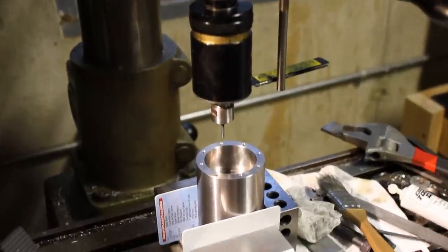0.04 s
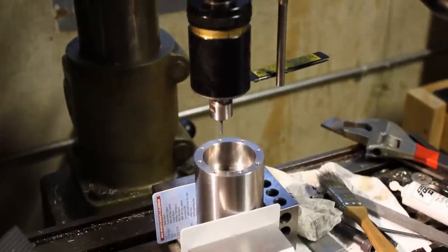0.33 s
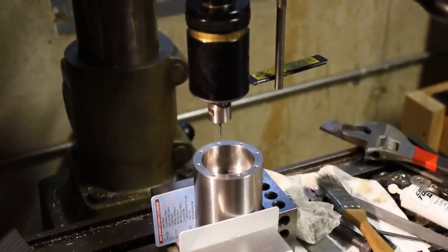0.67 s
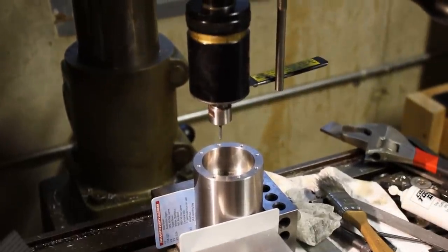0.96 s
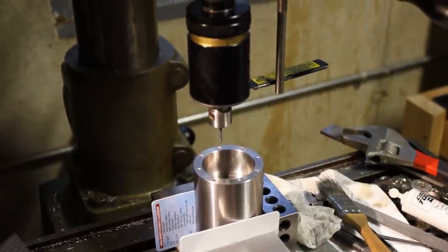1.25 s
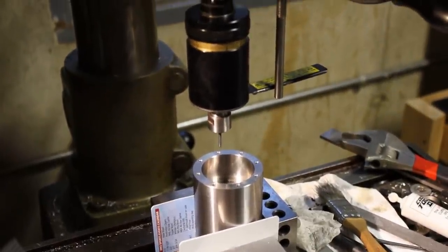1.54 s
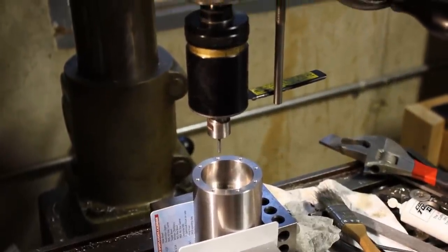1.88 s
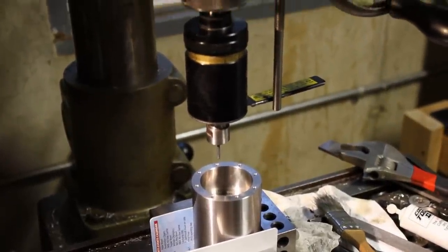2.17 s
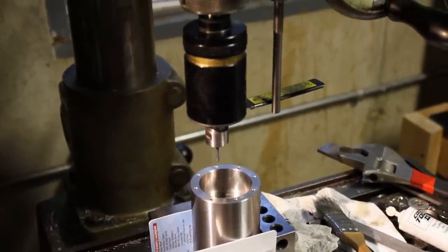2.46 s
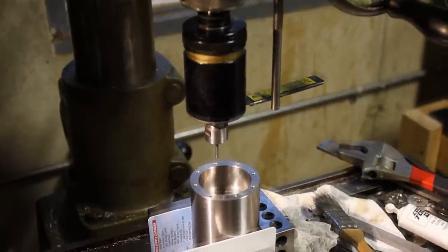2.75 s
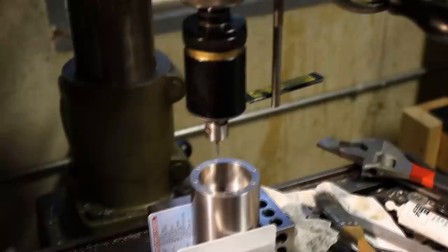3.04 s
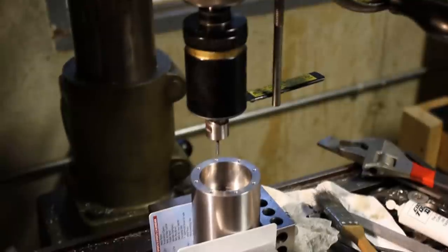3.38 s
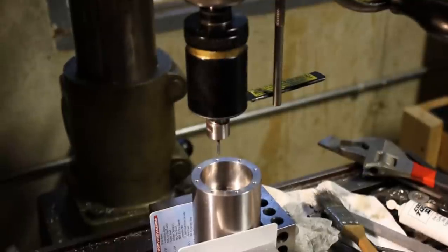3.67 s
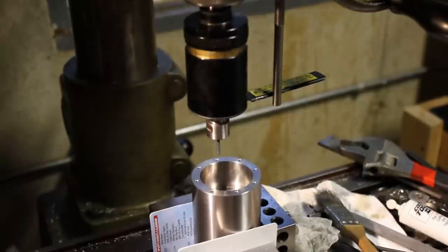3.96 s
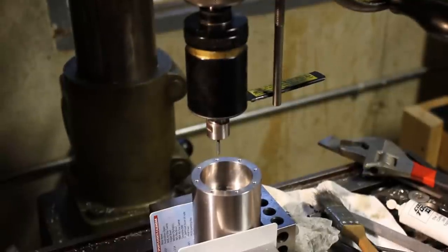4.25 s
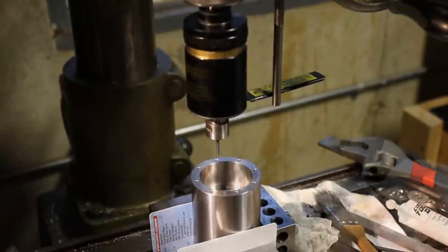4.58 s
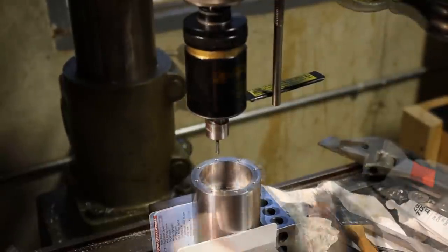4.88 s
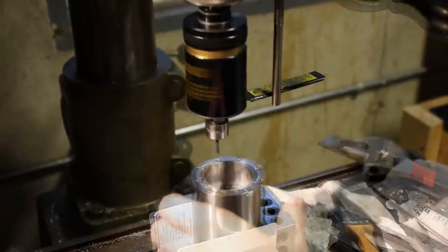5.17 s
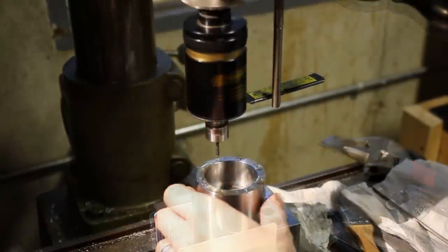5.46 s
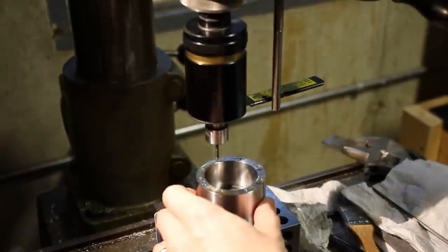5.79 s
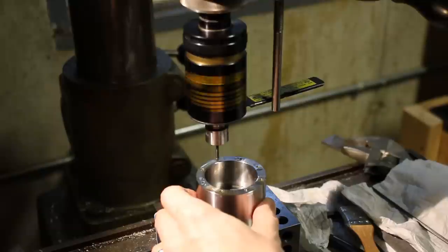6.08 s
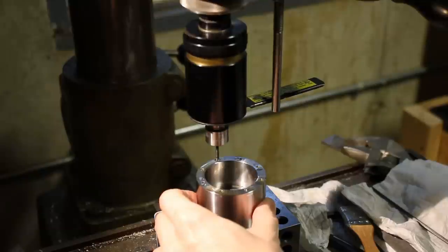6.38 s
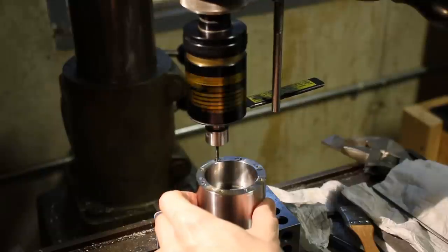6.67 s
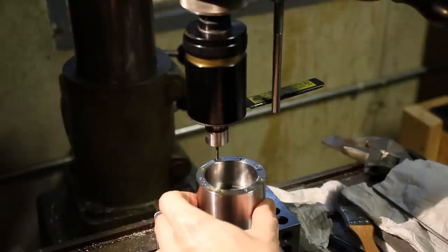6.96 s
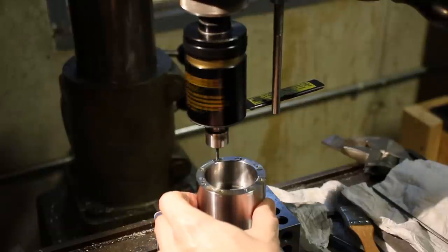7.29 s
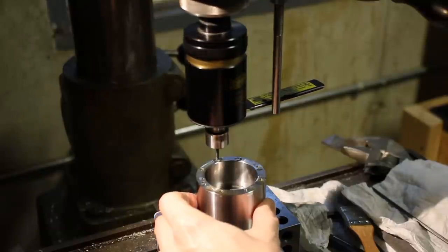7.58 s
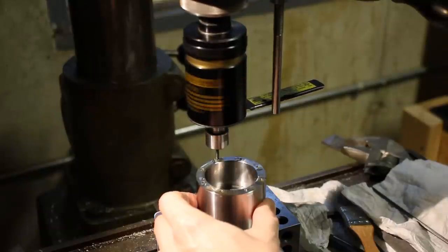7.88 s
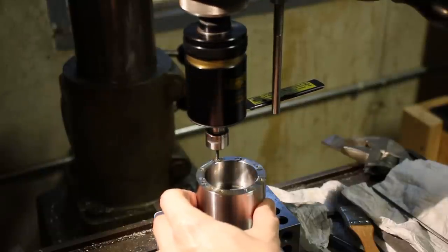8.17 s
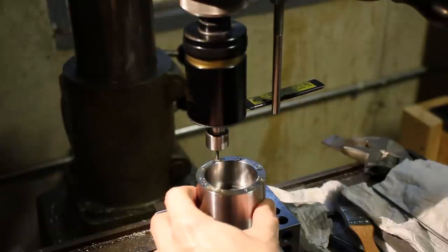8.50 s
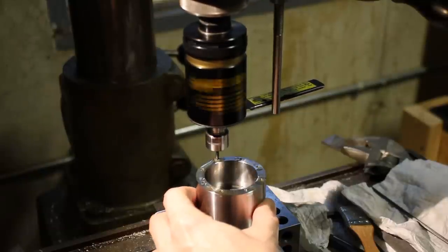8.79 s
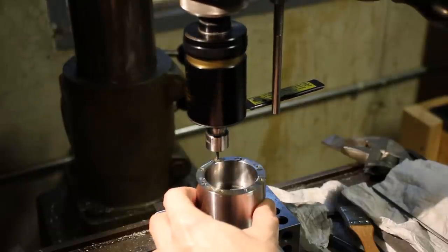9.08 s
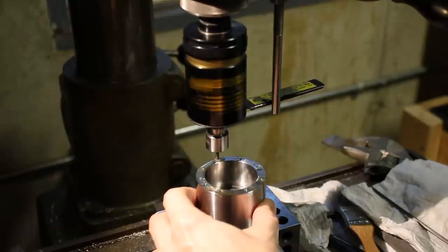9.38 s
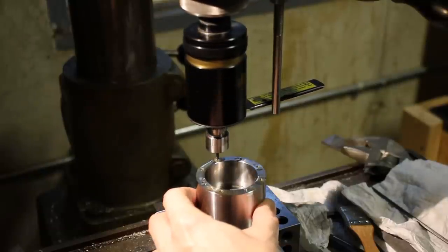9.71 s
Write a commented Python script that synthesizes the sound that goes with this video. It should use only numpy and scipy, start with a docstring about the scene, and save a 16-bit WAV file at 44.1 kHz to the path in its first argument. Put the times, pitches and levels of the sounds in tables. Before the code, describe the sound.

A drill press with a tapping head, heard up close in a workshop. At first there is only low fan hum and the light ticking of the handle being eased down. A sharp switch click brings on loud, steady whirring and metallic chatter with ringing tones. Small knocks and brief steel rasps come through, and in the last few seconds the belt flutters more strongly as the machine keeps running.

```python
"""Drill press tapping

A quiet workshop hums; the quill is eased down with faint ticks and scrapes, and a switch snaps. Then the scene
changes to the press at full speed: its inverter-fed motor whines, and belts, pulleys and a tapping head rattle
densely, ringing the iron frame and the head's steel shell. As the tap bites, the belt slaps harder, the shell
rings louder and the spindle groans once a turn."""
import sys
import numpy as np
from scipy import signal
from scipy.fft import rfft, irfft
from scipy.io import wavfile
from scipy.ndimage import uniform_filter1d

SR = 44100
rng = np.random.default_rng(int(sys.argv[2]) if len(sys.argv) > 2 else 0)


def int16_out(signal):
    """Quantize to a 16-bit WAV file."""
    q = np.round(np.clip(np.atleast_2d(signal).T, -1, 1) * 32767)
    wavfile.write(sys.argv[1], SR, q.astype(np.int16))


N = 433944

START_S, SUPPLY_HZ = 4.379, 47.95  # the motor shaft turns at the supply rate
BITE_S, BITE_LENGTH_S = 7.08, 0.46
DESCENT_S, DESCENT_LENGTH_S = 6.2, 3

# rattle force (time [s], level [dB])
RATTLE_LEVEL = [(4.4, -26.5), (4.9, -28), (5.35, -26.7), (5.65, -27), (5.88, -29), (6.23, -25),
                (6.45, -27.5), (6.85, -27), (7.5, -26.5), (8.1, -27), (8.9, -28), (9.35, -28),
                (9.55, -29.5), (9.82, -26.5)]
# shaft pressure on the rattle (multiple of shaft rate, depth [0-1])
SHAFT_HARMONICS = [(1, 0.1), (2, 0.05), (3, 0.02), (4, 0), (6, 0)]
# backlash knocks (time [s], level [dB], t60 [s])
BACKLASH_KNOCKS = [(4.613, -21.5, 0.068), (4.786, -24, .07), (5.028, -25.5, 0.11), (5.549, -22, 0.054),
                   (5.672, -21.5, .04), (6.117, -20.5, .04), (6.204, -21.5, .05), (6.54, -25, .08),
                   (6.787, -22, 0.048), (7.965, -32, 0.045), (8.06, -23, 0.067), (8.162, -23.5, 0.044),
                   (8.75, -20.5, 0.04), (9.384, -25.5, 0.088), (9.487, -24, .04), (9.581, -17.5, 0.023)]
# frame, table and belt guard (frequency [Hz], width [Hz], gain [dB])
FRAME_MODES = [(339, 38, -19), (431.7, 9.4, -12), (484, 23, -13.5), (534, 51, -15.5), (614, 17, -16.5),
               (705, 42, -12.5), (763, 13.3, -9.5), (805, 10, -30), (840, 37, -13.5), (897, 36, -13),
               (946, 10, -12), (1000, 20, -12.5), (1097, 35, -13.5), (1170, 12, -15), (1205, 24, -11.5),
               (1233, 5.6, -6.5), (1284, 36, -11.5), (1310, 19, -12.5), (1351, 5.7, -7.5), (1387, 18, -9),
               (1465, 32, -13), (1500, 23, -10.5)]
# tapping head and pulleys (frequency [Hz], width [Hz], gain [dB])
HEAD_MODES = [(1579, 25, -3.9), (1625, 13, -2.4), (1666, 26, -7.7), (1755, 68, -7.7), (1850, 39, -9.1),
              (1895, 24, -8.7), (1963, 10, -1.9), (2001, 45, -5.2), (2090, 52, -5.3), (2224, 50, -11.4),
              (2404, 40, -10.8), (2492, 23, -9.0), (2549, 30, -10.6), (2656, 16, -12.5), (2792, 150, -16.3),
              (3003, 35, -18.0), (3130, 86, -12.3), (3256, 80, -17.9), (3359, 59, -18.1), (3511, 55, -16.8),
              (3641, 74, -16.2), (3760, 17, -17.5), (3875, 23, -14.5), (3967, 66, -17.6), (4060, 23, -11.8),
              (4493, 17, -20.4), (4623, 150, -23.5), (4857, 42, -23.9), (5138, 40, -26.5),
              (5448, 51, -27.2)]
# bearings and chuck (frequency [Hz], width [Hz], gain [dB])
BEARING_MODES = [(6320, 90, -38), (7600, 100, -30), (8060, 90, -29.5), (8940, 410, -31), (9930, 170, -29.5),
                 (10400, 180, -31.5), (11850, 270, -37), (13600, 250, -37), (14130, 330, -29.5),
                 (14700, 150, -36), (15250, 350, -33)]
# floor of weak modes between these (frequency [Hz], gain [dB])
PRESS_COLOUR = [(25, -45), (95, -49), (170, -38.5), (295, -30.5), (370, -21), (700, -22), (1500, -20),
                (2300, -18.5), (3200, -28.5), (4200, -21.5), (5000, -32), (8800, -36.5), (12800, -39.5),
                (15600, -44)]
# head's steel shell (frequency [Hz], width [Hz])
SHELL_MODES = [(1605, 72), (2040, 86)]
# column rumble (frequency [Hz], gain [dB])
COLUMN_COLOUR = [(25, -14), (70, -14), (105, 5), (190, 1.5), (260, -0.5), (600, -58)]
# magnetic whine (multiple of carrier, offset [multiples of supply rate], relative level [dB])
WHINE_LINES = [(1, -7, -57), (1, -3, -52), (1, -1, -48), (1, 1, -56), (1, 3, -53), (2, -10, -67),
               (2, -8, -63), (2, -7, -69), (2, -6, -56), (2, -5, -64), (2, -4, -56), (2, -3, -65),
               (2, -2, -63), (2, -1, -71), (2, 0, -64), (2, 2, -64), (2, 4, -68), (3, -11, -71),
               (3, -9, -64), (3, -7, -70), (3, -5, -65), (3, -1, -65), (3, 1, -67), (3, 3, -70)]
# motor and belt hum (frequency [Hz], relative level [dB])
MOTOR_HUM = [(143.8, -66), (192, -70), (285.3, -53.5), (430.7, -56), (764.4, -54.5)]
# steel workpiece grating (time [s], frequency [Hz], width [Hz], level [dB], t60 [s])
WORKPIECE_TOUCHES = [(5.148, 12250, 500, -39, 0.093), (5.148, 13450, 300, -46, .1),
                     (8.228, 5000, 500, -34.5, .06), (8.346, 10750, 450, -47.5, .2),
                     (8.396, 8750, 600, -36, 0.073), (9.093, 4900, 450, -37, .12),
                     (9.398, 10700, 400, -42, .15)]
# switch housing (frequency [Hz], width [Hz], gain [dB])
SWITCH_MODES = [(200, 110, -1), (520, 200, -9), (1370, 120, -7), (2290, 260, -3.5), (3300, 400, -5.5),
                (3900, 340, 2.5), (5450, 500, -7.5), (6340, 300, -10), (7300, 500, -11), (10450, 920, -7.5),
                (12300, 550, -10), (13300, 810, -11)]
# feed handle (time [s], level [dB], tilt [dB/octave])
HANDLE_TICKS = [(.088, -50, -4), (.177, -55, -3.5), (.236, -57, 0), (.319, -53.5, -.5), (1.386, -59, 1),
                (3.07, -55, 2), (3.153, -46, 4), (3.239, -51, 5), (3.25, -52, 3), (3.29, -50, 3),
                (3.37, -54, 4)]
# quill in its sleeve (centre [s], half length [s], level [dB], tilt [dB/octave])
QUILL_SCRAPES = [(0.309, .006, -60, -4.5), (2.198, .04, -60.5, -5.5), (3.143, 0.015, -49.5, -1),
                 (3.234, 0.06, -59, -2), (3.461, 0.012, -55, 2), (3.785, .008, -58, -5.5)]
# ticks and scrapes (frequency [Hz], gain [dB])
FEED_COLOUR = [(100, -39), (700, 0), (1500, 2), (2300, 1), (3300, -3), (3950, 5), (4700, -4), (9000, -7.5),
               (13000, -8), (16000, -21)]
# background air (frequency [Hz], gain [dB])
AIR_COLOUR = [(15, -43), (25, -21.5), (44, -11), (75, -18.5), (119, -9), (188, -12.5), (204, -10.5),
              (267, -10), (349, -17.5), (378, -18), (523, -18), (567, -18), (1020, -19), (1340, -23),
              (3400, -32), (5000, -34), (6500, -37.5), (15500, -46.5)]
# air swell and dip (start [s], end [s], change above the bass [dB], bass change [dB])
AIR_SWELLS = [(2.55, 4.06, 3.5, 1.5), (4.19, 4.3, -3, -8)]
# mains and fans (frequency [Hz], relative level [dB])
MAINS_FAN_HUM = [(50, -72.5), (120, -66), (153, -71.5), (219, -69), (257, -71.5), (274, -68.5), (377, -74),
                 (555, -74.5), (614, -80), (856, -76), (990, -77.5)]


def rattle(impacts_per_s=9000, scatter_db=1.5, hiss=0.81, flutter_db=0.74):
    """Loose splines and gears chatter in step with shaft and belt, ringing the whole machine."""
    hits = rng.random(N) < impacts_per_s / SR
    impacts = hits * rng.standard_normal(N) * undb(scatter_db * rng.standard_normal(N))
    force = unit(unit(impacts) + hiss * rng.standard_normal(N))
    level_db = np.interp(clock(), *np.transpose(RATTLE_LEVEL)) + flutter_db * walk(70)
    force = force * contact_pressure() * undb(level_db)
    for time_s, db, t60_s in BACKLASH_KNOCKS:
        add(force, time_s, undb(db) * burst(t60_s))
    return ring(force, response(PRESS_COLOUR, FRAME_MODES + HEAD_MODES + BEARING_MODES))


def contact_pressure(shaft_peak_s=4.431, belt_hz=11.25, slap_s=9.037, idle_depth=0.035, load_depth=0.13):
    """The shaft presses the loose contacts every turn; the belt slaps once a lap, harder under load."""
    t, bite = clock(), ramp(BITE_S, BITE_LENGTH_S)
    shaft_phase = 2 * np.pi * SUPPLY_HZ * (t - shaft_peak_s)
    shaft = sum(depth * np.cos(k * shaft_phase) for k, depth in SHAFT_HARMONICS)
    belt_depth = idle_depth * (1 - bite) + load_depth * bite
    return 1 + shaft + belt_depth * np.cos(2 * np.pi * belt_hz * (t - slap_s))


def head_shell(vibration, idle_db=-0.5, bite_gain_db=2, jangle_db=1.0):
    """Pass vibration through the shell: its two tones jangle unevenly and grow as the tap bites."""
    shell = sum(signal.lfilter(*signal.iirpeak(hz, hz / width_hz, fs=SR), vibration)
                for hz, width_hz in SHELL_MODES)
    gain_db = idle_db + bite_gain_db * ramp(BITE_S, BITE_LENGTH_S) + jangle_db * walk(25)
    return vibration + (undb(gain_db) - 1) * shell


def column_rumble(level_db=-59.5, deep_gain_db=-9.5):
    """The column rumbles, less as the tap descends."""
    rumble = ring(rng.standard_normal(N), response(COLUMN_COLOUR))
    return rumble * undb(level_db + deep_gain_db * ramp(DESCENT_S, DESCENT_LENGTH_S))


def motor(carrier_hz=4096.5, thrum_db=-63.5):
    """Inverter whine, rotor thrum and hum, all easing as the tap descends."""
    deep = ramp(DESCENT_S, DESCENT_LENGTH_S)
    # pulse-width modulation puts sidebands around each carrier multiple
    lines = [(k * carrier_hz + offset * SUPPLY_HZ, db) for k, offset, db in WHINE_LINES]
    whine = undb(1.5 - 5 * deep) * tones(lines, waver_db=1.5, drift_rad=0.18)
    thrum = tones([(SUPPLY_HZ, thrum_db - 8 * deep)], waver_db=-0.5, drift_rad=0.15)
    hum = undb(0.5 - 3 * deep) * tones(MOTOR_HUM, waver_db=0, drift_rad=0.74)
    return whine + thrum + hum


def spindle_groan(turn_hz=5.17, groan_hz=239, peak_s=9.04, idle_db=-59, bite_gain_db=7):
    """The spindle groans once a turn, louder when the tap bites."""
    swell = np.cos(np.pi * turn_hz * (clock() - peak_s)) ** 2
    level_db = idle_db + bite_gain_db * ramp(BITE_S, BITE_LENGTH_S)
    return swell * tones([(groan_hz, level_db)], waver_db=1.5, drift_rad=0.92)


def workpiece(crack_gain_db=1, crack_t60_s=0.015, bump_s=8.346, bump_db=-51):
    """Raspy steel-on-steel touches, each opening with a bright crack; one soft bump on the table."""
    out, floor = np.zeros(N), [(30, -60), (16000, -80)]
    for time_s, hz, width_hz, db, t60_s in WORKPIECE_TOUCHES:
        rasp = signal.fftconvolve(burst(t60_s), response(floor, [(hz, width_hz, 0)], size=2048))
        crack = signal.fftconvolve(burst(crack_t60_s), response(floor, [(hz, hz, 0)], size=2048))
        add(out, time_s, undb(db) * (rasp + undb(crack_gain_db) * crack))
    bump = signal.fftconvolve(burst(t60_s=0.31), response(floor, [(190, 53, 0)]))
    add(out, bump_s, undb(bump_db) * bump)
    return out


def switch(snap_s=4.1783, slide_db=-30, snap_db=-6.5, chatter_db=-22.5, shiver_db=-44, room_db=-61):
    """The toggle slides, snaps over and chatters; its housing shivers and the room answers faintly."""
    force = np.zeros(N)
    slide = burst(t60_s=0.009, size=512)[::-1]
    add(force, snap_s - len(slide) / SR, undb(slide_db) * slide)
    add(force, snap_s, undb([snap_db]))
    for db, t60_s in (chatter_db, 0.006), (shiver_db, 0.049), (room_db, 0.33):
        add(force, snap_s, undb(db) * burst(t60_s))
    colour = [(30, -42), (1000, -15), (9000, -18), (14000, -21), (16000, -36)]
    return ring(force, response(colour, SWITCH_MODES, size=2048))


def feed(tick_t60_s=0.013):
    """The handle ticks and the quill slides with a grainy scrape."""
    out, t = np.zeros(N), clock()
    for time_s, db, tilt in HANDLE_TICKS:
        handle = response(FEED_COLOUR, tilt_db_per_oct=tilt, size=512)
        add(out, time_s, undb(db) * signal.fftconvolve(burst(tick_t60_s), handle))
    for centre_s, half_s, db, tilt in QUILL_SCRAPES:
        grains = unit(rng.standard_normal(N) * undb(3 * walk(700)))
        envelope = undb(db) * np.exp(-((t - centre_s) / half_s) ** 4 / 2)
        out += ring(grains * envelope, response(FEED_COLOUR, tilt_db_per_oct=tilt, size=512))
    return out


def workshop(air_db=-59.3, edge_s=0.08):
    """Background air with mains and fan hum; the level swells, then dips briefly."""
    upper_db, bass_db = 0, 0
    for start_s, end_s, upper_step_db, bass_step_db in AIR_SWELLS:
        held = ramp(start_s - edge_s / 2, edge_s) - ramp(end_s - edge_s / 2, edge_s)
        upper_db += upper_step_db * held
        bass_db += bass_step_db * held
    air = ring(rng.standard_normal(N), response(AIR_COLOUR)) * undb(air_db + bass_db + 0.37 * walk(12))
    air = shelf(air, edge_hz=230, gain_db=upper_db - bass_db)
    air = shelf(air, edge_hz=1400, gain_db=0.5)
    hum = tones(MAINS_FAN_HUM, waver_db=1.3, drift_rad=1.94) * undb(bass_db - 0.5)
    return air + hum


def response(colour, modes=(), tilt_db_per_oct=0, size=16384):
    """Unit-energy impulse response from colour (Hz, dB) and modes (Hz, width Hz, dB)."""
    hz = np.maximum(np.arange(size // 2 + 1) * SR / size, 1)
    colour_hz, colour_db = np.transpose(colour)
    power = undb(np.interp(np.log(hz), np.log(colour_hz), colour_db)) ** 2
    for centre_hz, width_hz, peak_db in modes:
        power += (undb(peak_db) / (1 + ((hz - centre_hz) / (0.777 * width_hz)) ** 2)) ** 2
    magnitude = np.sqrt(power) * undb(tilt_db_per_oct * np.log2(hz))
    # fold the cepstrum for minimum phase
    cepstrum = irfft(np.log(magnitude))
    cepstrum[1:size // 2] *= 2
    cepstrum[size // 2 + 1:] = 0
    impulse = irfft(np.exp(rfft(cepstrum)))
    return impulse / np.sqrt(np.sum(impulse ** 2))


def ring(force, impulse):
    """Play a force through an impulse response."""
    return signal.oaconvolve(force, impulse)[:N]


def tones(lines, waver_db, drift_rad):
    """Independent sines (Hz, rms dB) wavering in level and phase."""
    out, t = np.zeros(N), clock()
    for hz, db in lines:
        amplitude = np.sqrt(2) * undb(db + waver_db * walk(5))
        phase = 2 * np.pi * (hz * t + rng.random()) + drift_rad * walk(3.01)
        out += amplitude * np.sin(phase)
    return out


def burst(t60_s, size=16384):
    """Exponentially decaying noise."""
    return rng.standard_normal(size) * np.exp(-np.log(1000) * np.arange(size) / (SR * t60_s))


def walk(rate_hz):
    """Smooth random drift, spread near 1."""
    hold = max(int(SR / rate_hz), 1)
    steps = np.repeat(rng.standard_normal(N // hold + 1), hold)
    return 1.3 * uniform_filter1d(uniform_filter1d(steps, hold), hold)[:N]


def shelf(x, edge_hz, gain_db):
    """High shelf."""
    top = signal.sosfiltfilt(signal.butter(2, edge_hz, "high", fs=SR, output="sos"), x)
    return x + (undb(gain_db) - 1) * top


def add(out, time_s, x):
    """Mix x into out at a time."""
    i = min(max(int(time_s * SR), 0), N)
    out[i:i + len(x)] += x[:N - i]


def ramp(start_s, length_s):
    """Linear rise from 0 to 1."""
    return np.clip((clock() - start_s) / length_s, 0, 1)


def clock():
    """Sample times [s]."""
    return np.arange(N) / SR


def undb(db):
    """Decibels to gain."""
    return 10 ** (np.asarray(db) / 20)


def unit(x):
    """Scale to rms 1."""
    return x / np.sqrt(np.mean(x ** 2))


def scene():
    """The scene changes at once from the quiet shop to the running press."""
    running = ramp(START_S, length_s=0.0011)
    press = head_shell(rattle()) + column_rumble() + motor() + spindle_groan() + workpiece()
    return (running * press + (1 - running) * workshop() + feed() + switch())[None]


def record(dry):
    """Steep low-pass at 15.72 kHz."""
    return signal.sosfilt(signal.ellip(12, 0.1, 80, 15720, fs=SR, output="sos"), dry)


dry = scene()
out = record(dry)
int16_out(out)
```